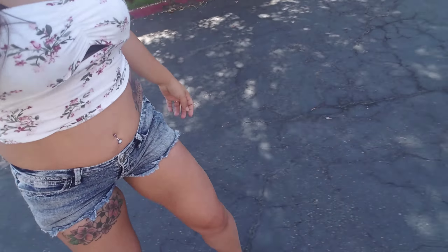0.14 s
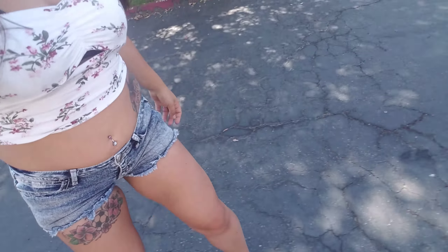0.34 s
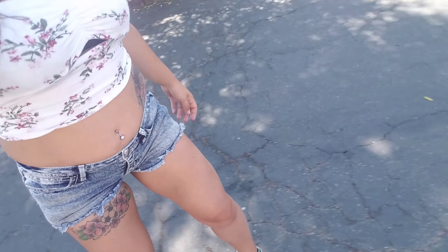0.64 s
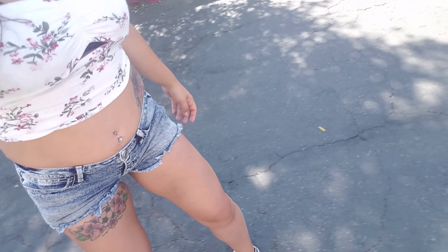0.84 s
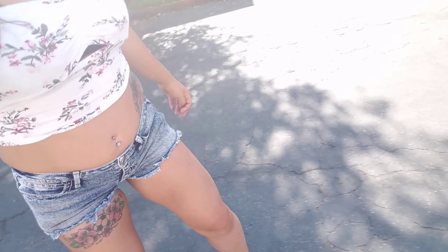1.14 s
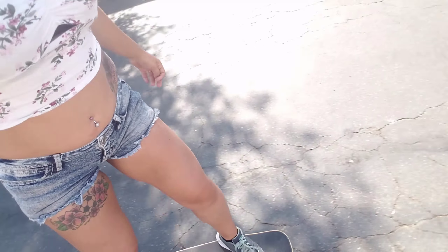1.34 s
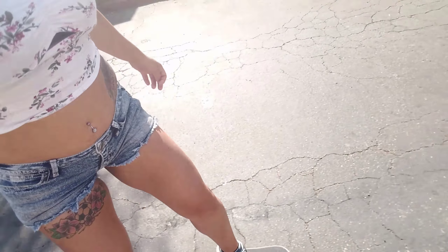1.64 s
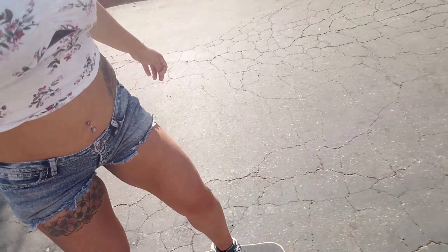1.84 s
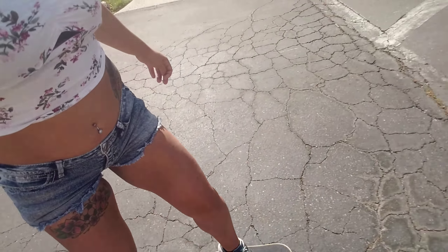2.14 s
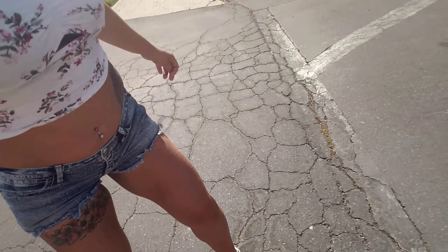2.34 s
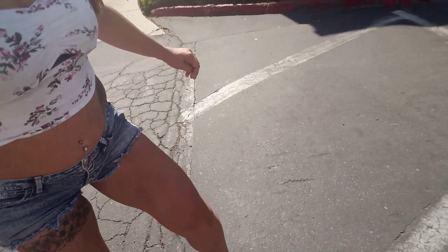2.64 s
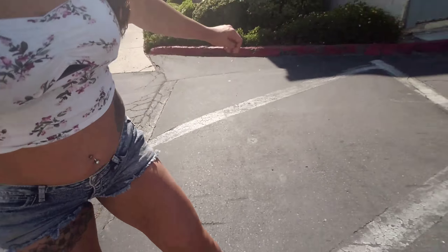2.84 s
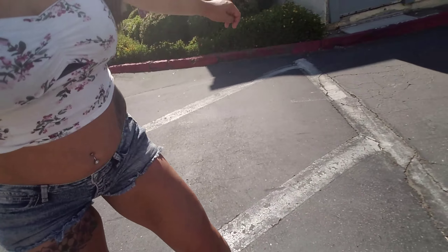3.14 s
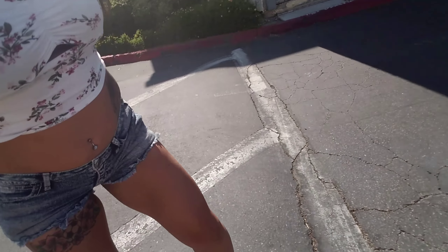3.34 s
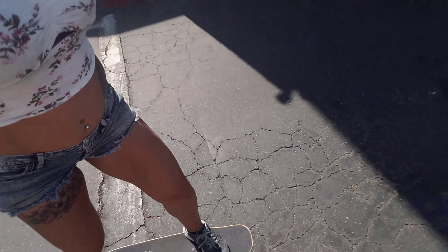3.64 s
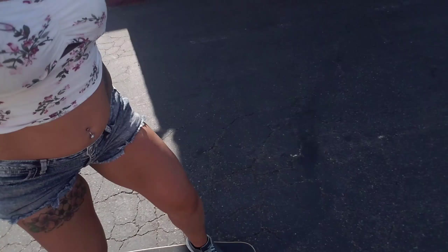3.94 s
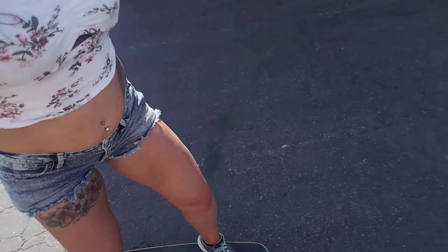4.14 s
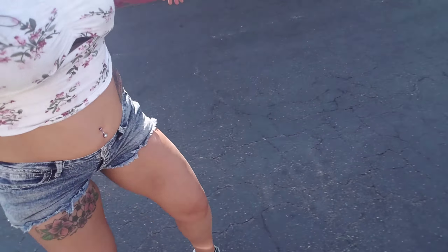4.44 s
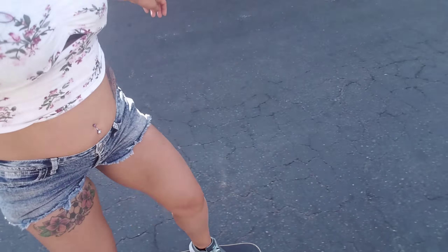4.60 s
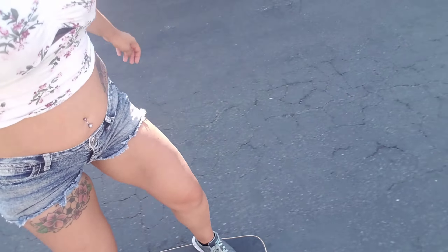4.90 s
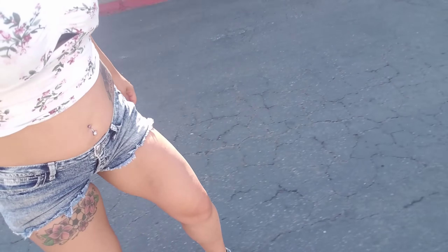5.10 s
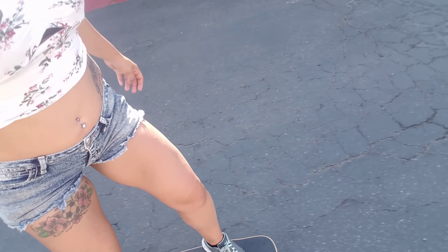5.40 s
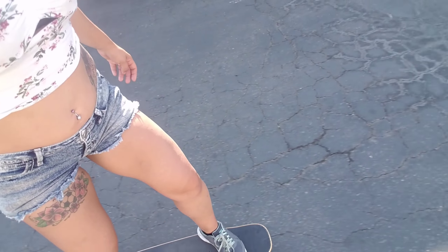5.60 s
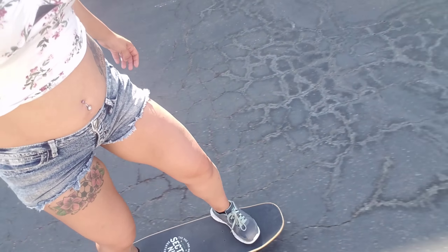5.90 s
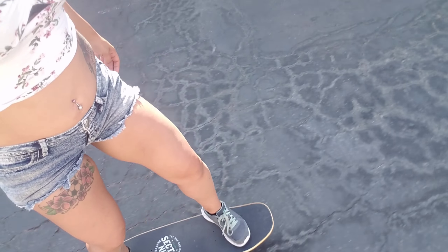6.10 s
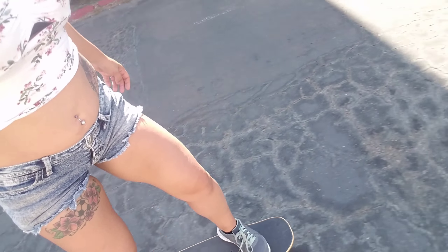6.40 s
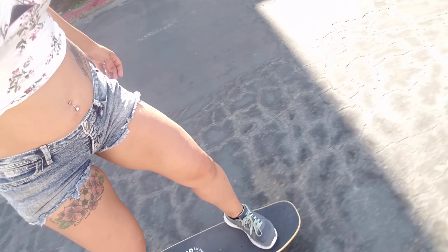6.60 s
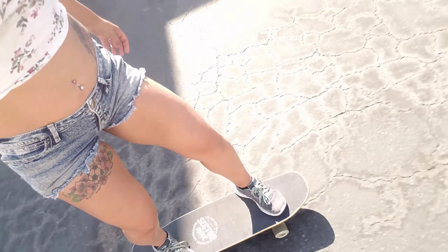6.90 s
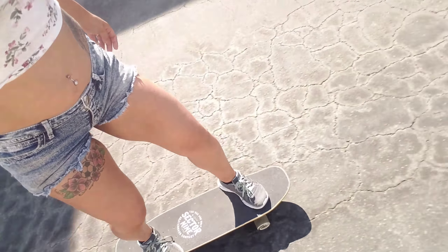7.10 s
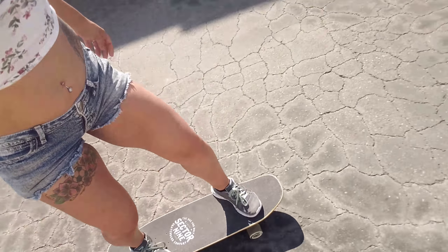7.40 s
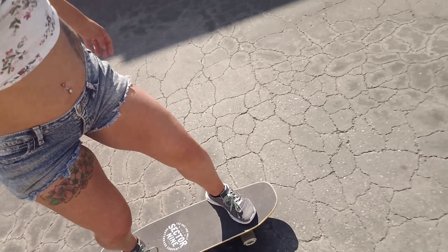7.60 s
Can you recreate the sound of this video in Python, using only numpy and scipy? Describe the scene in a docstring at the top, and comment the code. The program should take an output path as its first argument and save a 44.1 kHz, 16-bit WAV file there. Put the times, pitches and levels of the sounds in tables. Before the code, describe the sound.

Close handheld stereo microphone above a moving skateboard, outdoors on a dry lot. A gust buffets first with a knock and clack, then wheels rasp steadily over coarse asphalt while the wooden deck hums low. Cracks bring hollow knocks, sharp metallic clacks and brief rattles, densest before three seconds and around six, with a smoother lull just after three.

```python
"""A gust buffets the microphone first, over a knock and a clack; a skateboard rolls on coarse, cracked asphalt.
The road shakes the wooden deck, heard from above, which hums in a few low modes (filtered noise).
Grit rasps under the wheels as coloured noise in three ranges, and the road runs smoother near 3 s.
Cracks knock the deck (decaying sines), clack wheel and axle (noise bursts) and rattle them (ringing clicks)."""
import sys
import numpy as np
from scipy import signal
from scipy.fft import rfft, irfft, next_fast_len
from scipy.io import wavfile

SR = 44100
rng = np.random.default_rng(int(sys.argv[2]) if len(sys.argv) > 2 else 0)


def to_wav(s):
    """Save 16-bit WAV."""
    ch = np.atleast_2d(s).T  # columns
    pcm = np.round(np.clip(ch, -1, 1) * 32767)  # PCM
    wavfile.write(sys.argv[1], SR, pcm.astype(np.int16))


N = 341775   # samples


def amp(db):
    """Decibels to gain."""
    return 10 ** (np.asarray(db) / 20)


def rms_one(x):
    """Scale to unit rms."""
    return x / np.sqrt(np.mean(x ** 2) + 1e-20)


def in_time(rows):
    """Columns of a curve, one value per sample."""
    s, *columns = np.transpose(rows)
    return [np.interp(np.arange(N) / SR, s, c) for c in columns]


def at_hz(points, hz):
    """Read a table on a log-frequency axis."""
    table_hz, values = np.transpose(points)
    return np.interp(np.log(hz + 1), np.log(table_hz), values)


def drift(rate_hz):
    """Slow chance with spread 1: noise twice through a one-pole low-pass."""
    r = np.exp(-2 * np.pi * rate_hz / SR)
    noise = rng.standard_normal(N + SR)
    settled = signal.lfilter([1], [1, -2 * r, r * r], noise)[SR:]
    return rms_one(settled)


def resonate(x, hz, width_hz):
    """Two-pole resonance with gain 1 on top."""
    r = np.exp(-np.pi * width_hz / SR)
    gain = (1 - r * r) / 2
    return signal.lfilter([gain, 0, -gain], [1, -2 * r * np.cos(2 * np.pi * hz / SR), r * r], x)


# balance of the two ports: (frequency [Hz], left over right [dB])
LEFT_OVER_RIGHT = [(60, -1.5), (200, -4), (1200, -3.5), (2400, -6.5), (4400, -1.5), (6000, 1.5),
                   (8100, -10), (10000, -12), (12500, -6), (15000, -1)]
# how alike the ports sound: (frequency [Hz], power share of the common noise [0-1])
LIKENESS = [(80, 0.05), (140, 0.71), (1000, 0.45), (3000, 0.41), (7000, 0.3), (15000, 0.13)]
# phase by which the left port leads: (frequency [Hz], lead [rad])
LEFT_LEAD = [(20, 0), (400, -.1), (1380, -.7), (2000, -.2), (3010, .7), (4310, 1.7), (5080, .7), (7840, .3),
             (8100, -0.9), (11500, -10), (15200, -26)]


def at_ports(three, gain):
    """One shared and two own noises become left and right, coloured by gain(Hz)."""
    length = three.shape[-1]
    size = next_fast_len(length)
    hz = np.arange(size // 2 + 1) * SR / size
    shared, left, right = rfft(three, size)
    alike = np.clip(at_hz(LIKENESS, hz), 0, 1)
    pair = np.sqrt(alike) * shared + np.sqrt(1 - alike) * np.array([left, right])
    lean = amp(at_hz(LEFT_OVER_RIGHT, hz) / 2)
    early = np.exp(1j * at_hz(LEFT_LEAD, hz))
    return irfft(pair * gain(hz) * [lean * early, 1 / lean], size)[:, :length]


# gusts on the ports: (time [s], level [dB])
WIND = [(0, -17), (.12, -50), (.16, -28), (.2, -30.5), (.27, -30), (.48, -30), (.53, -39), (.62, -32.5),
        (.645, -42), (.68, -28), (.77, -27.5), (.95, -53), (1, -40), (1.13, -53), (1.2, -58), (5.6, -50),
        (6, -40), (6.3, -65), (7.75, -42)]
# colour of the gusts: (frequency [Hz], relative level per Hz [dB])
GUST = [(20, -20), (40, 5), (80, 2.5), (170, 4), (280, -2.5), (400, -48)]
# colour of the constant, dull headwind: (frequency [Hz], relative level per Hz [dB])
BREEZE = [(25, -30), (50, -4), (100, 4), (200, -63)]
BREEZE_DB, LUMPY_DB, LUMPY_HZ = -53.5, 2.5, 10


def blow(colour):
    """Turbulence on the ports: coloured noise whose level wanders in slow lumps."""
    lumpy = rng.standard_normal((3, N)) * amp(LUMPY_DB * drift(LUMPY_HZ))
    return rms_one(at_ports(lumpy, lambda hz: amp(at_hz(colour, hz))))


def wind():
    """Low noise, mostly its own at each port in the deep bass: brighter gusts over a dull headwind."""
    gust = blow(GUST)
    breeze = blow(BREEZE)
    return amp(in_time(WIND)[0]) * gust + amp(BREEZE_DB) * breeze


def snaps(per_s, spread_db, length_s):
    """Envelope of random grains crushed under the wheels, each a short swell that rises as it falls."""
    strength = amp(spread_db * np.minimum(rng.exponential(1, N), 2))
    marks = (rng.random(N) < per_s / SR) * strength
    fade = np.exp(-1 / (length_s * SR))
    return signal.filtfilt([1], [1, -fade], marks * (1 - fade ** 2))


def high_share(hz, edge_hz):
    """Power share of a range above its edge."""
    return 1 / (1 + (edge_hz / (hz + 1)) ** 6)


# colour of the grit, also under each clack: (frequency [Hz], relative level per Hz [dB])
GRIT = [(530, 4), (900, 3), (978, 4), (2580, -6.5), (3120, -5.5), (4010, -13.5), (5260, -14), (6440, -18),
        (7080, -26), (8160, -15), (9080, -21), (11800, -17.5), (14200, -24), (14800, -8), (15300, -69)]
FINE_HZ, FINEST_HZ = 4500, 7200   # edges between the three grain ranges


def grit(rasp_db, stones_db):
    """Crushed grains rasp in three ranges, swelling with the stones and steadier where the road is smooth."""
    rough = np.clip(amp(rasp_db - rasp_db.mean()), 0, 1.3)
    coarse = amp(stones_db) * (1 + 0.3 * rough * snaps(35, 1.6, 0.002))
    patches_db = 0.5 * stones_db + 3.0 * rough * drift(22)
    grains = snaps(77, 3, 0.0006)
    fine = amp(patches_db + 0.69 * drift(25)) * (1 + 0.71 * rough * grains)
    finest = amp(patches_db + 0.86 * drift(25))
    finest = finest * (1 + 1.3 * rough * grains + 0.6 * snaps(61, 4.4, 0.0006))

    def upper(hz):
        return high_share(hz, FINE_HZ)

    def top(hz):
        return high_share(hz, FINEST_HZ)

    ranges = [(coarse, lambda hz: 1 - upper(hz)),
              (fine, lambda hz: upper(hz) * (1 - top(hz))),
              (finest, lambda hz: upper(hz) * top(hz))]
    rasp = 0
    for swell, share in ranges:
        colour = lambda hz: amp(at_hz(GRIT, hz)) * np.sqrt(share(hz))
        rasp = rasp + at_ports(rng.standard_normal((3, N)) * swell, colour)
    return amp(rasp_db) * rms_one(rasp)


# modes of the axles and hangers: (frequency [Hz], width [Hz], strength [dB], halved for rattles)
AXLE = [(1113, 300, 18.5), (1400, 125, 15), (1800, 120, 6.5), (2260, 320, 0.5), (2700, 180, 2.5),
        (3080, 160, 2), (3450, 260, 1), (4330, 380, -0.5), (4730, 290, -5.5), (5560, 1600, -14.5)]
RATTLES_PER_S, RATTLE_DB, RATTLE_SPREAD_DB = 600, -36, 3.5


def rattle(after):
    """Loose axle parts chatter after each crack: dense clicks, each ringing one axle mode."""
    strength = amp(RATTLE_SPREAD_DB * np.minimum(rng.exponential(1, N), 2))
    marks = (rng.random(N) < RATTLES_PER_S / SR) * strength
    clicks = marks * rng.standard_normal((3, N)) + 1e-18
    dealt = rng.integers(0, len(AXLE), N)
    rings = sum(amp(db / 2) * resonate(clicks * (dealt == k), hz, width_hz)
                for k, (hz, width_hz, db) in enumerate(AXLE))
    return amp(RATTLE_DB) * np.sqrt(after) * rms_one(at_ports(rings, np.ones_like))


# hard clacks of wheel and axle:
# (time [s], peak below the sizzle [dB], centre [Hz], sizzle above 7 kHz against that peak [dB])
CLACKS = [(0.0094, -17.5, 1980, -4), (0.2065, -23, 2180, -31), (0.579, -25.5, 1830, -17),
          (0.599, -24, 3270, 0), (0.6108, -25.5, 3070, 2), (0.784, -26.5, 2670, 5.5),
          (0.854, -20, 2500, 1.5), (0.88, -24, 1850, -11), (0.914, -31, 1430, -20), (1.043, -28, 2000, 1),
          (1.147, -25.5, 2160, -5), (1.44, -22.5, 2260, -2.5), (1.501, -26.5, 3000, 2),
          (1.957, -29, 1910, -3), (2.063, -16.5, 5530, -11), (2.1878, -26, 3100, -5),
          (2.3527, -20.5, 2770, -2), (2.383, -25.5, 2700, 0), (2.498, -24.5, 2680, -3),
          (2.515, -26, 2700, 4.5), (2.5641, -16, 2960, -7), (2.622, -25, 2700, -2), (2.643, -20, 2700, -5),
          (2.611, -23.5, 2450, -1), (2.6515, -13, 2760, -6), (2.659, -13, 2900, -6),
          (2.657, -16.5, 1400, -10), (2.678, -23, 2270, -4), (2.688, -23, 5400, -10),
          (2.697, -25, 2220, -13), (2.7318, -16.5, 2300, -25), (2.7515, -16, 1960, -24),
          (2.769, -23, 4800, -17), (2.775, -21, 3450, -14), (2.776, -20.5, 1400, -20),
          (2.812, -28, 2600, -3), (3.632, -28, 2360, 3), (3.64, -9, 3560, -22), (3.64, -17.5, 2250, -29),
          (3.671, -20.5, 2120, -6), (3.718, -20.5, 2000, -12), (3.769, -11.5, 1840, -8.5),
          (3.778, -19, 1900, -24), (3.932, -28, 2300, -2), (3.9832, -21.5, 4370, -10),
          (4.118, -25.5, 3450, -8), (4.194, -18.5, 3200, -28), (4.234, -23, 3230, -11),
          (4.649, -20.5, 2330, -6), (4.687, -23.5, 2730, -4), (4.8, -16, 1960, -23),
          (4.801, -20, 4800, -27), (4.808, -27, 3820, -4), (4.826, -22, 2200, -15),
          (4.8153, -14.5, 1850, -16), (4.832, -20, 2600, -20), (5.038, -21, 3280, -2.5),
          (5.091, -26, 2000, -4), (5.198, -23, 2970, -5), (5.261, -28.5, 3000, -3), (5.313, -26, 1920, -6),
          (5.35, -24.5, 2900, -13), (5.6123, -26, 2730, -2), (5.688, -24.5, 2890, -3),
          (5.7417, -22, 3150, -3), (5.7931, -20, 2630, -8), (5.8005, -14.5, 3100, -11),
          (5.83, -19.5, 3080, -8), (5.9662, -23, 2720, -5), (5.975, -26, 2800, -7), (6.024, -18, 2720, -9),
          (6.035, -20.5, 2780, -7), (6.046, -11, 2280, -13), (6.065, -24, 3100, -4),
          (6.072, -23, 2700, -11), (6.094, -27, 2800, -6), (6.104, -19.5, 2730, -2.5),
          (6.124, -15, 2640, -18), (6.126, -13, 1400, -25), (6.144, -13.5, 4800, -18),
          (6.147, -25, 1400, -17), (6.1558, -18, 2780, -7), (6.1956, -22, 2850, -10),
          (6.211, -22, 2800, -5), (6.254, -18.5, 1910, 0), (6.2614, -17.5, 3400, 1),
          (6.269, -18, 1410, -20), (6.27, -20, 3450, -12), (6.348, -27.5, 2020, -3), (6.361, -22, 2890, -7),
          (6.444, -16, 2780, -5), (6.453, -21.5, 3380, -5), (6.568, -22, 1950, -8),
          (6.7222, -22.5, 2540, -5), (6.781, -22.5, 1940, -5), (6.8954, -25, 3080, -2),
          (6.9315, -23, 3040, -17), (7.078, -24, 1900, -13), (7.323, -26, 2680, -4),
          (7.398, -24.5, 1910, -16), (7.456, -26, 2890, -2), (7.533, -26, 2150, -7),
          (7.5643, -24, 2700, -1), (7.624, -30, 2100, 6)]
SIZZLE_HZ = 7000
AXLE_SPREAD_DB, AXLE_REACH = 3, 6.3   # modes are struck unevenly, most of all those near the centre
SWELL_CYCLES = 2.4   # time constant of the swell, in cycles of the centre
TAIL_T60_S, TAIL_DB = .055, -6   # the burst then rattles out
HALO_S, HALO_DB = .0056, -16.5   # a faint noise swells just before each clack and fades after it
CLACK_OWN = .6   # gain of each port's own noise: a clack comes from one spot, so the ports share more
LEAD_IN, CLACK_LENGTH = 256, 2048   # samples


def clacks():
    """Wheel and axle strike: bursts through nearby axle modes, a dull skirt and a sizzle on top."""
    out = np.zeros((2, N + CLACK_LENGTH))
    t = np.arange(-LEAD_IN, CLACK_LENGTH - LEAD_IN) / SR
    axle_hz, width_hz, axle_db = np.transpose(AXLE)[..., None]
    for s, db, centre_hz, sizzle_db in CLACKS:
        age = np.maximum(t, 0) * centre_hz / SWELL_CYCLES
        swell = (np.e * age / 2) ** 2 * np.exp(-age)
        tail = amp(TAIL_DB - 60 * t / TAIL_T60_S) * (1 - np.exp(-age)) ** 2
        halo = amp(HALO_DB) * np.exp(-np.abs(t) / HALO_S)
        noise = rng.standard_normal((3, CLACK_LENGTH)) * [[1], [CLACK_OWN], [CLACK_OWN]]
        burst = noise * (swell + tail + halo)

        detune = axle_hz / centre_hz - centre_hz / axle_hz
        near = 1 / np.sqrt(1 + (AXLE_REACH * detune) ** 2)
        struck = near * amp(axle_db + AXLE_SPREAD_DB * rng.random(axle_hz.shape))

        def body(hz):
            ring = np.sum(struck / (1 + 2j * (hz - axle_hz) / width_hz), axis=0)
            return (0.21 * amp(at_hz(GRIT, hz)) + 1.03 * ring) / (1 + (hz / SIZZLE_HZ) ** 8)

        def sizzle(hz):
            return amp(at_hz(GRIT, hz)) / (1 + (SIZZLE_HZ / (hz + 1)) ** 8)

        low, high = at_ports(burst, body), at_ports(burst, sizzle)
        both = low / np.abs(low).max() + amp(sizzle_db) * high / np.abs(high).max()
        out[:, round(s * SR) - LEAD_IN:][:, :CLACK_LENGTH] += amp(db) * both
    return out[:, :N]


# modes of the wooden deck: (frequency [Hz], width of one resonance pass [Hz], relative level [dB])
DECK = [(105, 63, -29.5), (207.3, 110, -21.5), (294.4, 67.4, -7.5), (508.8, 128, -6), (550.4, 60, 1),
        (598.8, 90, -9), (741.7, 80, -13)]
# deck modes below 400 Hz against the rest: (time [s], level [dB])
LOW_MODES = [(0, 5), (.9, -2), (1.5, -1), (2.55, -3), (2.66, 3), (2.85, -2), (3.5, 0), (5, -2.5), (6.2, -1),
             (7, -2.5), (7.75, -1)]
SWAY_DB, SWAY_HZ = 1, 2.7   # the rider's feet shift, so each mode swells and sinks on its own


def deck_modes(force):
    """Wood rings in modes of alternating sign, each filtered twice to keep the valleys between deep."""
    low_db, = in_time(LOW_MODES)
    total = 0
    for k, (hz, width_hz, db) in enumerate(DECK):
        level = amp(db + low_db * (hz < 400) + SWAY_DB * drift(SWAY_HZ))
        ringing = resonate(resonate(force, hz, width_hz), hz, width_hz)
        total = total + (-1) ** k * level * ringing
    return total


# wheels dropping over a crack edge, felt by the deck:
# (time [s], peak level [dB], hardness: extra drive to the top mode [dB])
BUMPS = [(0.008, -7.5, -15), (0.141, -16, 1), (0.292, -10.5, -4), (0.53, -12, 2), (0.704, -11, -17),
         (0.793, -4, -19), (0.92, -9, 16), (1.146, -11, 10), (1.577, -9.5, -22), (2.04, -10.5, -13),
         (2.565, -10.5, 12), (2.606, -6, -20), (2.619, -7, -16), (2.652, -5.5, -4), (2.675, -5, 5),
         (2.711, -10, 13), (2.73, -12, 23), (2.748, -12, 13), (2.769, -5.5, 3), (2.778, -6, 14),
         (2.799, -10, -2), (3.63, -4.5, 3), (3.7, -10, -3), (3.721, -10, 13), (3.733, -8.5, 13),
         (3.768, -3, 20), (3.776, -8.5, 8), (3.817, -9.5, -8), (4.196, -5.5, 13.5), (4.331, -13, 1),
         (4.8152, -2.5, -15), (4.951, -12, 7), (5.248, -7.5, 5), (5.376, -8.5, 3), (5.417, -10, 3),
         (5.58, -12, -6), (5.803, -2, 9.5), (5.833, -9, 5), (5.966, -8.5, 6), (6.032, -8, 0),
         (6.048, -6, 16.5), (6.1, -9, 22), (6.126, -1.5, 8.5), (6.143, -7.5, 15), (6.172, -9, -4),
         (6.261, -12, 16), (6.267, -4, 10), (6.432, -11, -4), (6.459, -8, 10), (6.855, -5, -10),
         (6.932, -3, 9.5), (6.99, -8, 5), (7.196, -9, -14)]
THUD_DB = 5.5   # a jolt drives the lowest mode harder than the road does
WHEEL_GIVE_S = .002
KNOCK_LENGTH = 4096   # samples


def knocks():
    """A crack edge jolts the deck for a moment; every mode answers at once and dies away."""
    out = np.zeros(N + KNOCK_LENGTH)
    t = np.arange(KNOCK_LENGTH) / SR
    low_db, = in_time(LOW_MODES)
    luck = rng.random((len(BUMPS), len(DECK), 2))
    for (s, db, hard_db), draws in zip(BUMPS, luck):
        start = round(s * SR)
        knock = 0
        for (hz, width_hz, mode_db), (phase, strength) in zip(DECK, draws):
            level_db = 1.1 * mode_db + 5 * strength + low_db[start] * (hz < 400)
            level_db = level_db + hard_db * (hz > 650) + THUD_DB * (hz < 150)
            tone = np.sin(2 * np.pi * (hz * t + 0.12 * phase))
            knock = knock + amp(level_db) * np.exp(-.6 * np.pi * width_hz * t) * tone
        knock = knock * (1 - np.exp(-t / WHEEL_GIVE_S)) ** 2   # the soft wheel rounds off the blow
        out[start:][:KNOCK_LENGTH] += amp(db) * knock / np.abs(knock).max()
    return out[:N]


# the microphone turns in the hand: (time [s], delay of the deck at the left port [microseconds])
PORT_LAG = [(0, 150), (2, 170), (3.5, 205), (5, 205), (6.5, 150), (7.75, 150)]
PORT_TURN = .27   # radians the left port's housing gives back at all pitches
DECK_PAN_DB, DECK_SPREAD = -1.7, .04   # left over right; gain of the far end of the deck
FLUTTER_S, FLUTTER_HZ = .0006, 7   # the deck flexes, so the pitches of its hum waver a little


def deck(hum_db, stones_db):
    """Stones shake the deck without pause into a hum, crack edges knock it."""
    shake = rng.standard_normal((2, N)) * amp(.6 * stones_db)
    hum, aside = (rms_one(deck_modes(force)) for force in shake)
    n = np.arange(N)
    hum = np.interp(n + FLUTTER_S * SR * drift(FLUTTER_HZ), n, hum)
    body = amp(hum_db) * hum + knocks()
    lag_s = in_time(PORT_LAG)[0] / 10 ** 6
    late = np.interp(n - lag_s * SR, n, body)
    late = np.real(signal.hilbert(late, next_fast_len(N))[:N] * np.exp(1j * PORT_TURN))
    spread = DECK_SPREAD * amp(hum_db) * aside   # the far end reaches each port differently
    pan = amp(DECK_PAN_DB / 2)
    return np.array([(late + spread) * pan, (body - spread) / pan])


CRUMBLE_S, CRUMBLE_RASP_DB, CRUMBLE_HUM_DB = .024, -35.5, -15   # levels relative to each bump
AIRBORNE_S, AIRBORNE_DB = .008, -7   # a wheel hangs over the gap and shakes the deck less


def crumble():
    """Broken road roughens the rasp around each crack and the hum after it; a lull marks the gap."""
    s, db, _ = np.transpose(BUMPS)
    marks = np.zeros(N)
    marks[(s * SR).astype(int)] = amp(2 * db)   # power of each bump
    t = np.arange(-4096, 4097) / SR
    bell = np.exp(-(t / CRUMBLE_S) ** 2)
    around = np.maximum(signal.fftconvolve(marks, bell, "same"), 0)
    after = np.maximum(signal.fftconvolve(marks, bell * (t > 0), "same"), 0)
    lull = signal.fftconvolve(marks > 0, np.exp(-(t / AIRBORNE_S) ** 2), "same")
    return around, after, lull


# road coarseness away from cracks: (time [s], deck hum level [dB], grit rasp level [dB])
ROAD = [(0, -20.5, -37), (.4, -20, -38.5), (.7, -22, -39), (.95, -17, -35.5), (1.3, -23, -40.5),
        (1.9, -21, -38), (2.1, -21, -38.5), (2.45, -22, -39.5), (2.62, -19, -40), (2.8, -12.5, -33),
        (2.88, -32, -43.5), (3.1, -25.5, -41.5), (3.6, -26, -41.5), (3.8, -22, -38), (4.6, -20, -37),
        (5.55, -21.5, -40.5), (5.95, -21, -36.5), (6.15, -16.5, -32.5), (6.35, -25, -40.5),
        (6.55, -21.5, -36.5), (6.85, -16.5, -35), (7.2, -22, -38), (7.4, -20, -36.5), (7.75, -24, -39.5)]


def scene():
    """Deck, grit, clacks and rattle share the road; wind sits on the microphone."""
    road_hum_db, road_rasp_db = in_time(ROAD)
    around, after, lull = crumble()
    hum_power = amp(2 * road_hum_db) + amp(2 * CRUMBLE_HUM_DB) * after
    hum_db = 10 * np.log10(hum_power) + AIRBORNE_DB * lull
    rasp_db = 10 * np.log10(amp(2 * road_rasp_db) + amp(2 * CRUMBLE_RASP_DB) * around)
    stones_db = 1.87 * drift(20.6) + 0.3 * drift(200)   # coarser and finer patches pass by
    return wind() + grit(rasp_db, stones_db) + rattle(after) + clacks() + deck(hum_db, stones_db)


LOW_CUT_HZ, CUTOFF_HZ, CEILING = 36, 15700, .97


def record(dry):
    """The deepest bass is thinned, only the highest peaks are rounded off; the top is cut steeply."""
    low_cut = signal.butter(2, LOW_CUT_HZ, "high", fs=SR, output="sos")
    thinned = signal.sosfilt(low_cut, dry)
    rounded = thinned / (1 + np.abs(thinned / CEILING) ** 6) ** (1 / 6)
    top_cut = signal.cheby2(12, 70, CUTOFF_HZ, fs=SR, output="sos")
    return signal.sosfilt(top_cut, rounded)


dry = scene()
out = record(dry)
to_wav(out)
```